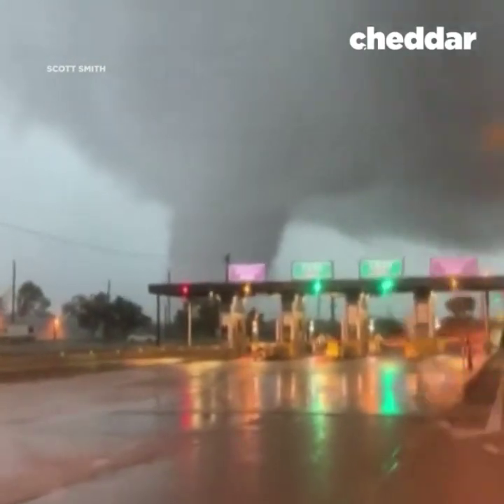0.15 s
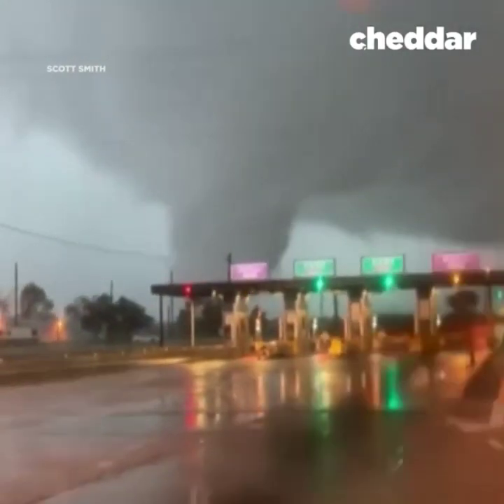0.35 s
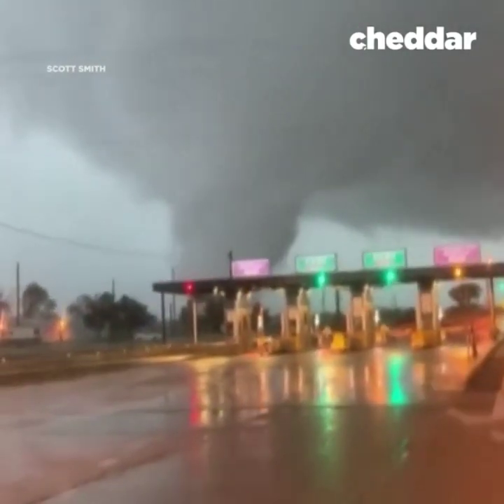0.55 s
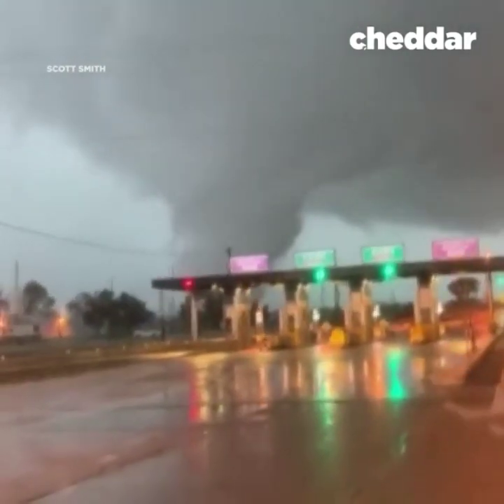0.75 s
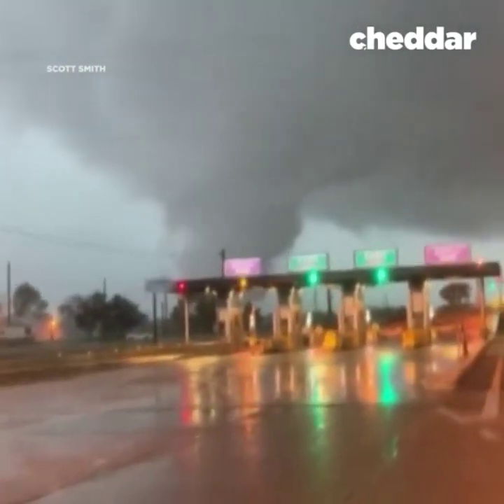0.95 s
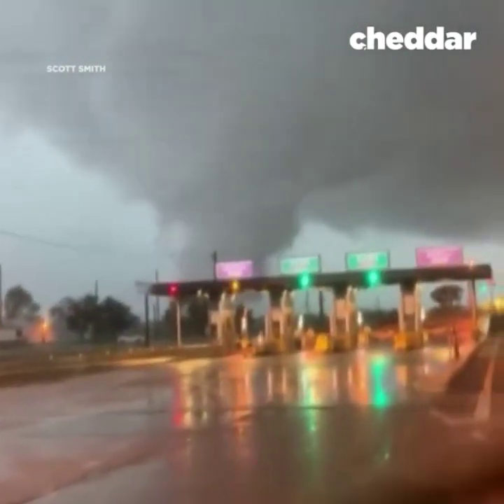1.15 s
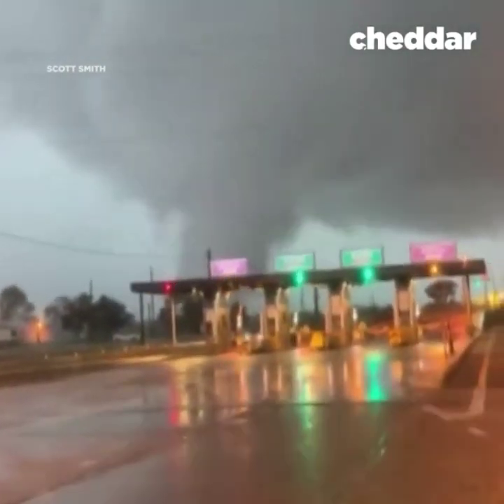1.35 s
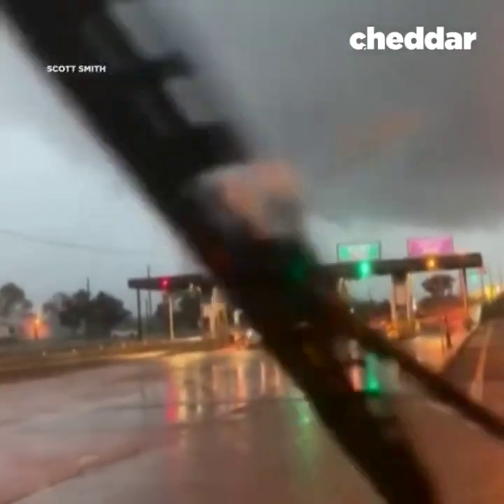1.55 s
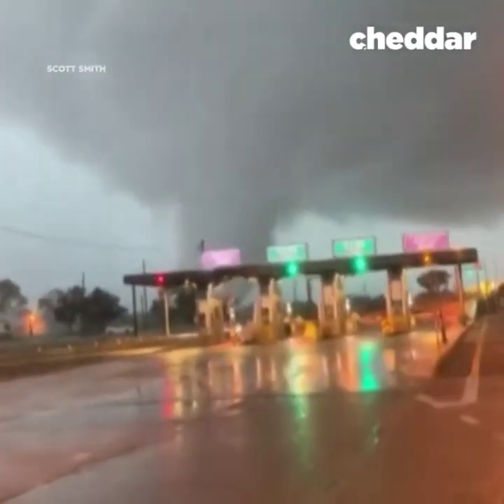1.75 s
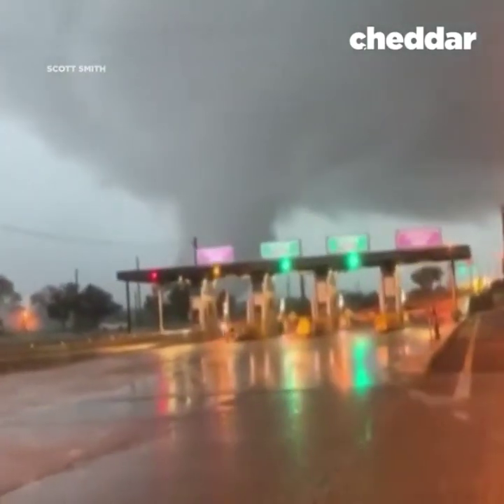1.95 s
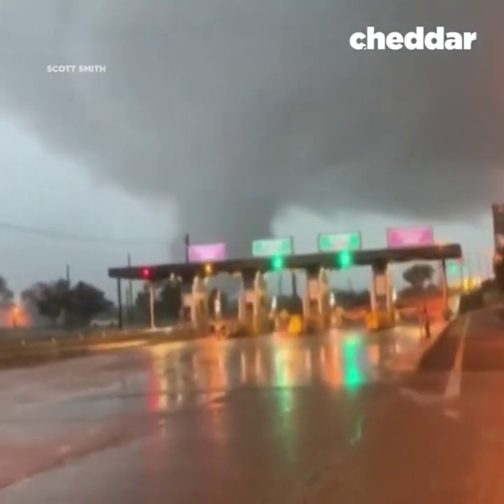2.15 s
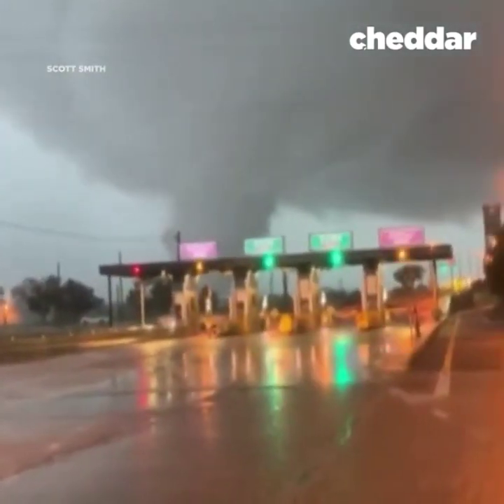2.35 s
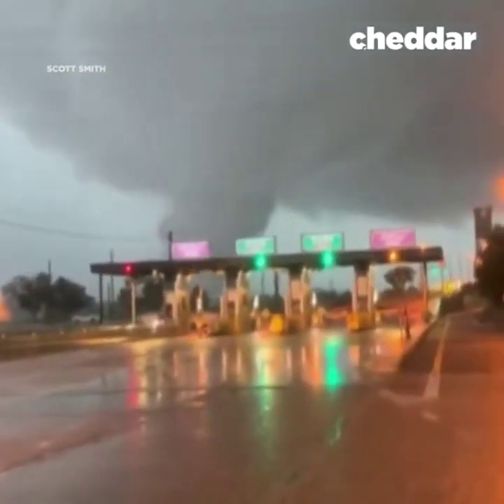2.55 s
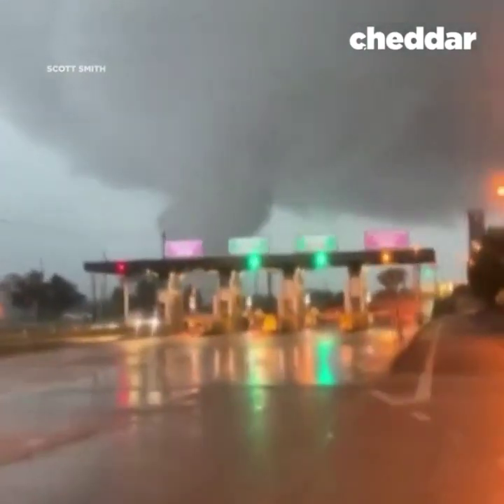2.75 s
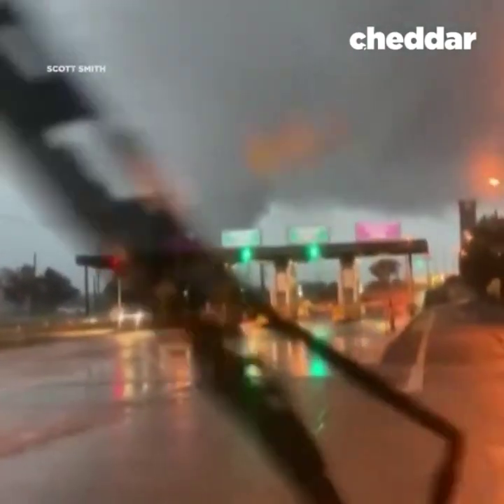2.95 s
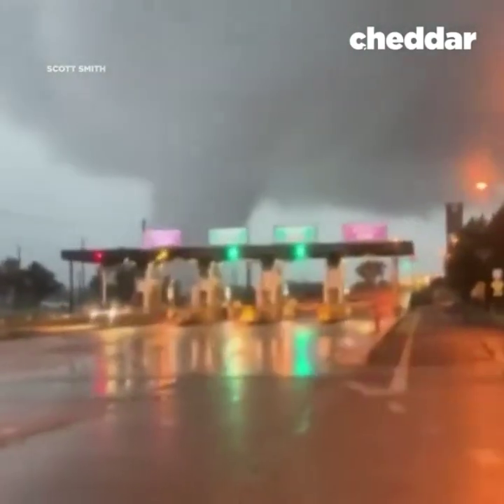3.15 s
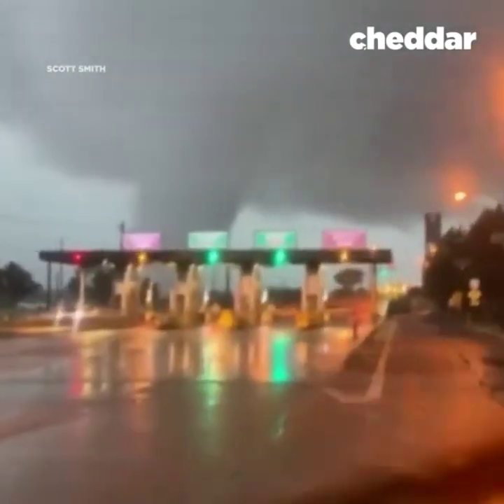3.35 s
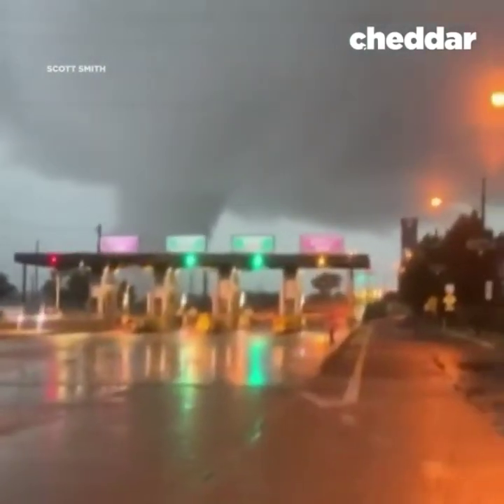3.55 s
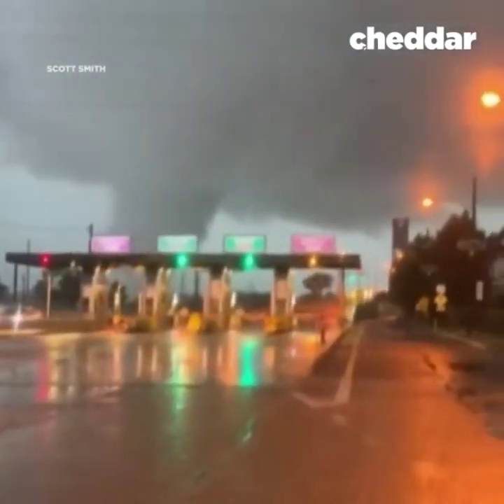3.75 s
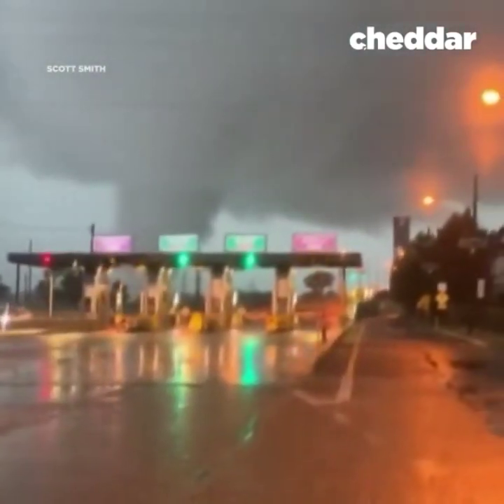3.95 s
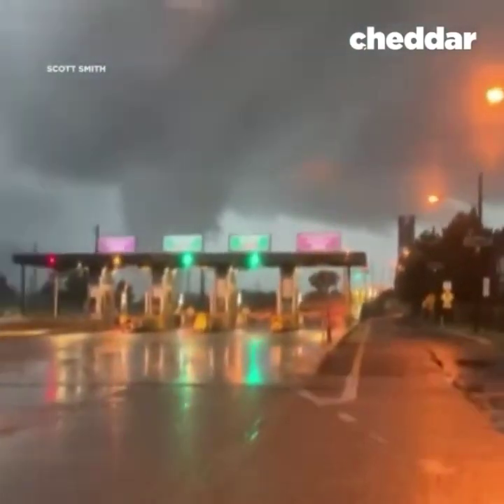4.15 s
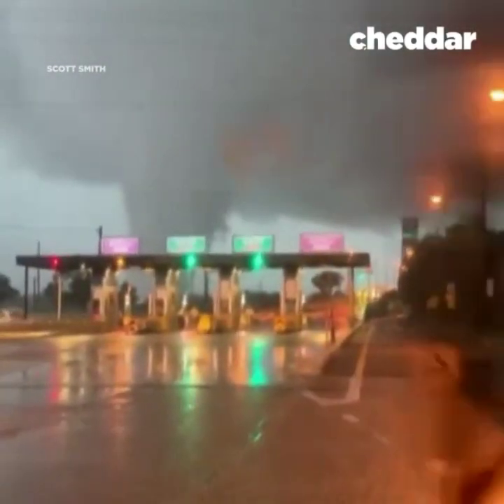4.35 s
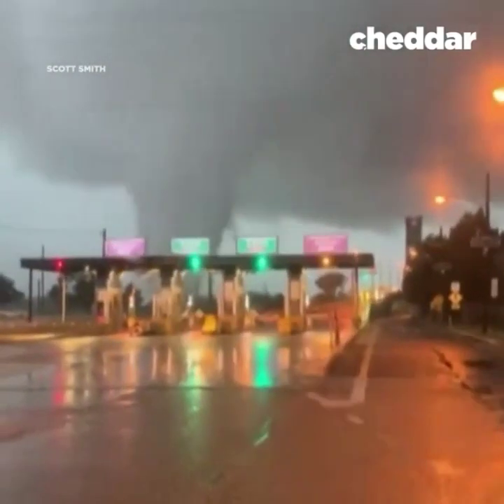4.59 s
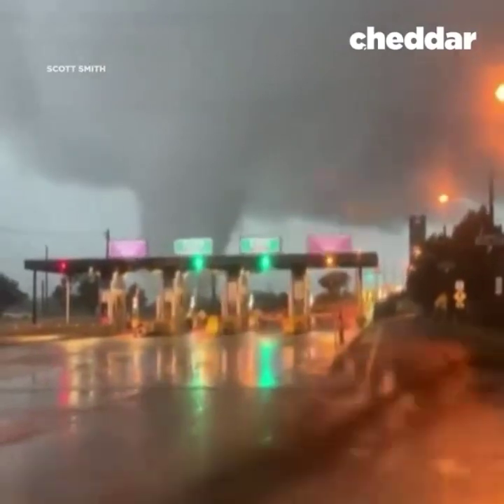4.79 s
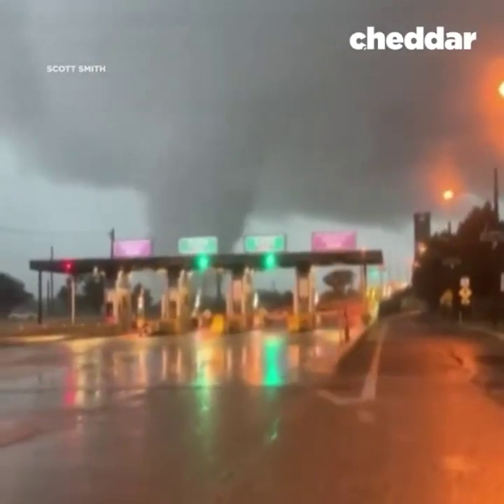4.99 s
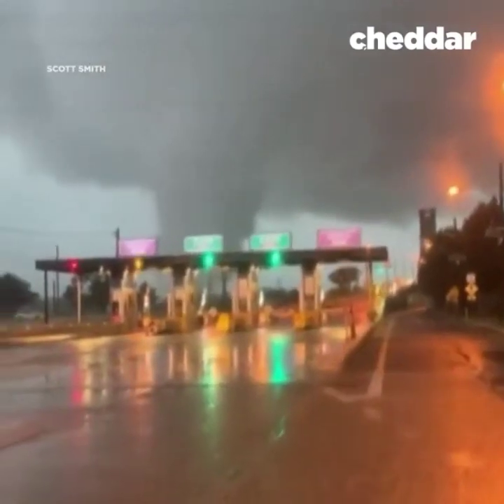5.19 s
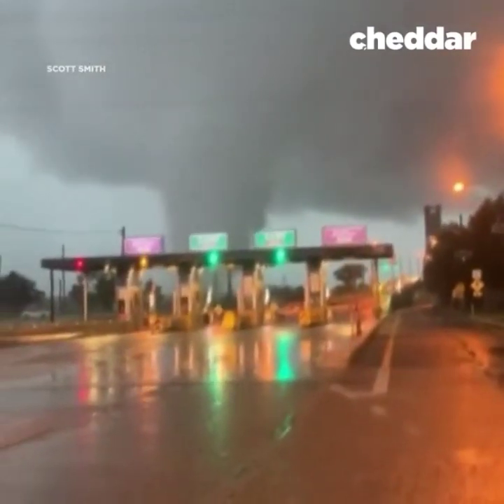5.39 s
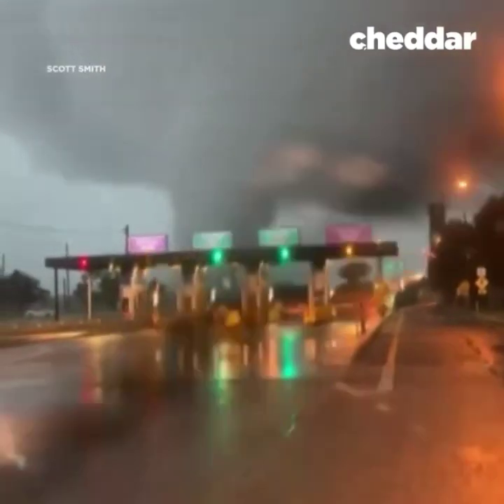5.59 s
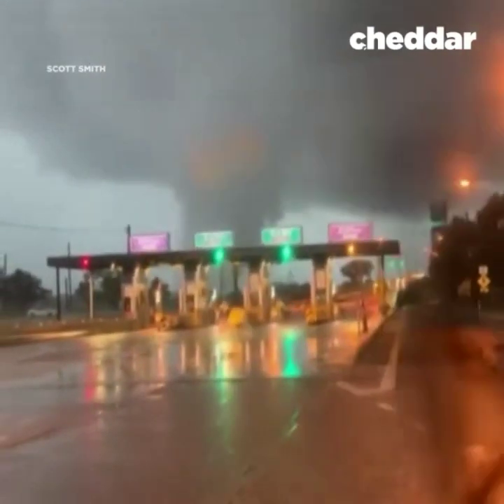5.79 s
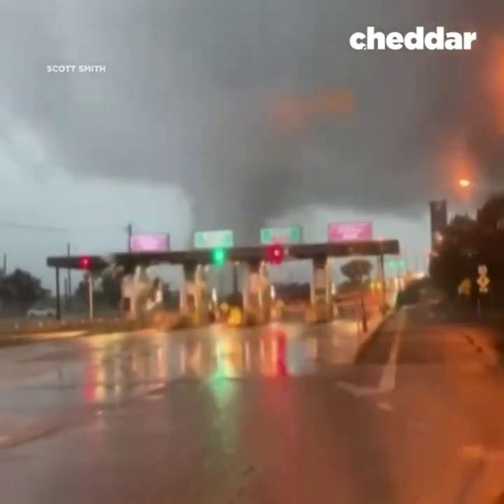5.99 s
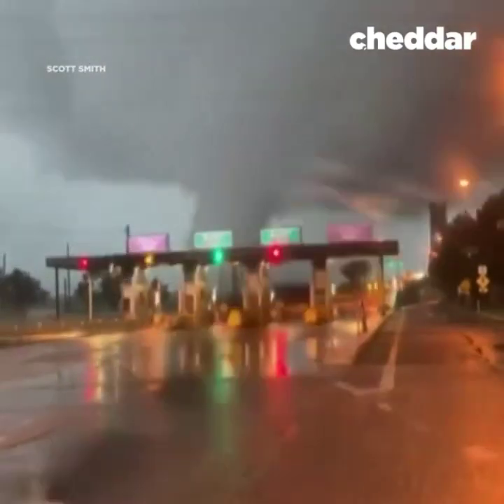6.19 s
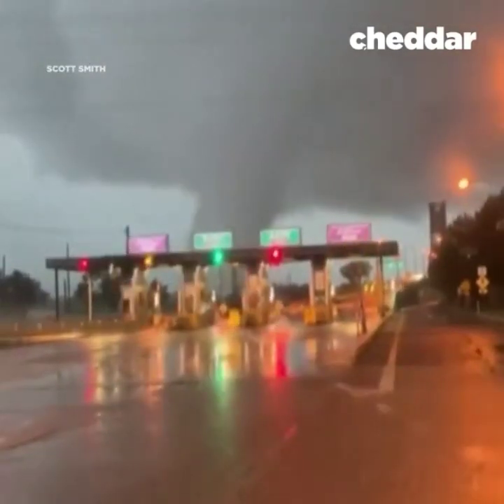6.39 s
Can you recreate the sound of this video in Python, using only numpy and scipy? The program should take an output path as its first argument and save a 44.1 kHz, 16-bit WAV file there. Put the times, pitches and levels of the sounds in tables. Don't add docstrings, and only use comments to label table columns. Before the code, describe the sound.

Inside a car in rain, low road rumble and soft wet tyre hiss, with windscreen wipers thumping and clunking every second and a half.

```python
import sys
import numpy as np
from scipy import signal
from scipy.fft import rfft, irfft, next_fast_len
from scipy.io import wavfile
from scipy.ndimage import uniform_filter1d, map_coordinates

SR = 44100
rng = np.random.default_rng(int(sys.argv[2]) if len(sys.argv) > 2 else 0)


def store_pcm(level_fs):
    pcm = np.round(np.clip(level_fs, -1, 1) * 32767).astype(np.int16)
    wavfile.write(sys.argv[1], SR, np.atleast_2d(pcm).T)


def nominal_scale(level):
    x = np.asarray(level, float) / 20
    return 10 ** x


N = 283563

# f/Hz, density/dB per Hz
SCUFF_SPECTRUM = [(150, -15), (350, 2), (520, 3), (1000, -11.5), (1500, -11.5), (2200, -25), (4000, -23.5),
                  (8000, -49)]
# f/Hz, density/dB per Hz
CRACK_SPECTRUM = [(1500, -26.5), (3000, 2.5), (4300, 0.5), (6500, -6.5), (9000, -14.5), (11000, -39),
                  (15000, -48)]
# t/s, end/s, f/Hz, level/dB
LINK_TONE = [
    (3.12, 3.92, 14062, -84),
    (5.89, 6.35, 14062, -83),
]
QUARTER_LEAD = np.array([[0], [1 / 4]])


def since(start):
    return np.clip(np.arange(N) / SR - start, 0, None)


def between(start, end):
    return (since(start) > 0) * (since(end) == 0)


def unit(x):
    return x / np.sqrt(np.mean(x ** 2) + 1e-20)


def along(points, hz):
    f, value = np.transpose(points)
    return np.interp(np.log(hz + 1), np.log(f + 1), value)


def filtered(x, response):
    size = next_fast_len(N + SR // 2)
    hz = np.fft.rfftfreq(size, 1 / SR)
    return irfft(rfft(x, size) * response(hz), size)[..., :N]


def modes(table):
    def response(f):
        total = 0
        for k, (centre, width, db) in enumerate(table):
            damping = 1j * f * width
            total = total + (-1) ** k * nominal_scale(db) * damping / (centre * centre - f * f + damping)
        return total
    return response


def colour(points):
    return lambda hz: nominal_scale(along(points, hz))


def rush(response, patchy_db):
    z = signal.stft(rng.standard_normal((2, N + 512)), nperseg=512)[2]
    field = uniform_filter1d(rng.standard_normal(z.shape[1:]), size=6, axis=0)
    field = uniform_filter1d(field, size=10, axis=1)
    noise = signal.istft(z * nominal_scale(patchy_db * unit(field)), nperseg=512)[1][:, :N]
    return unit(filtered(noise, response))


def held(start, length, db, rise, fall, sag_db):
    t = since(start)
    release = np.exp(-np.clip(t - length, 0, None) / fall)
    return nominal_scale(db - sag_db * t) * (1 - np.exp(-t / rise)) * release


def bursts(times, dbs, rise, t60):
    t = np.arange(N) / SR
    total = 0
    for s, db in zip(times, dbs):
        onset = 1 - np.exp(-np.clip(t - s, 0, 1) / rise)
        total = total + nominal_scale(db - 60 * np.abs(t - s) / t60) * onset
    return total


def struck(envelope, response):
    noise = rng.standard_normal((2, N))
    return filtered(noise * envelope, response) / np.std(filtered(noise, response))


def blows(times, dbs, soft, response, spread):
    t = np.arange(N) / SR
    push = sum(nominal_scale(db) * np.exp(-((t - s) / soft) ** 2) for s, db in zip(times, dbs))
    shape = filtered(-push, response)
    return np.array([shape, spread * np.imag(signal.hilbert(shape))])


def thump(s, db, hz, length):
    t = np.arange(N) / SR - s
    swing = np.cos(2 * np.pi * (hz * t + QUARTER_LEAD))
    return nominal_scale(db) * np.exp(-(t / length) ** 2) * swing * [[1], [1.5]]


def ring(s, db, rise):
    # f/Hz, level/dB, T60/s
    shell_modes = [(86.6, -19, 0.76), (252, -7.5, 0.14), (327, -13.5, 0.17), (411.5, -19.5, 0.24)]
    t = since(s)
    phases = rng.random(len(shell_modes))
    late, main_phase = rng.random(2)
    main_hz = 163 + 42 / (1 + np.exp(-(t - 0.045 - 0.012 * late) / 0.00764))
    main_cycles = np.cumsum(main_hz) / SR + main_phase + QUARTER_LEAD
    total = nominal_scale(0.5 - 60 * t / 0.43) * np.sin(2 * np.pi * main_cycles)
    for (hz, level, t60), phase in zip(shell_modes, phases):
        total += nominal_scale(level - 60 * t / t60) * np.sin(2 * np.pi * (hz * t + phase + QUARTER_LEAD))
    return nominal_scale(db) * (1 - np.exp(-t / rise)) * total * [[1], [0.9]]


def glass(f):
    # f/Hz, width/Hz, level/dB
    pane_modes = [(460, 330, -9), (772, 58, -5.5), (956, 120, -6), (1348, 162, -1.5), (1440, 300, -5.5),
                  (2100, 640, -16.5)]
    return modes(pane_modes)(f) / (1 + 1j * f / 2600) ** 2


def road():
    # t/s, water level/dB, unevenness level/dB
    surface = [(0, -2.5, 3), (.5, -1, -2), (.75, -2.5, -1.5), (1.1, -1.5, 1.5), (1.45, -3, -1.5),
               (1.8, 1.5, -0.5), (2.3, -3.5, -0.5), (2.7, -5.5, -1), (3.3, 0.5, 0.5), (4.1, 2, -1.5),
               (4.6, -3, 1), (4.95, -9, -2.5), (5.25, -2, -0.5), (5.4, 3, -0.5), (5.8, 2.5, -0.5),
               (6.05, 9, 2), (6.43, 0, -0.5)]
    # t/s, length/s, level/dB, finest mist over it/dB
    puddles = [(0, .03, -77, -4.5), (0.34, .12, -88.5, -7), (0.844, 0.099, -90.5, 10),
               (1.695, 0.15, -71.5, -8), (1.98, .12, -83, 3), (2.512, .05, -82, 3), (2.726, 0.15, -89.5, 8),
               (3.099, .05, -68.5, -6), (3.507, .025, -76, -8), (3.72, 0.056, -81.5, -6),
               (3.927, 0.038, -86, 2.5), (4.157, .06, -72, -1.5), (4.38, 0.044, -73, -5),
               (4.589, .025, -82, 0), (4.815, 0.042, -87, 16.5), (5.415, 0.22, -82, 0),
               (5.837, 0.044, -82.5, 8), (5.896, 0.083, -76.5, 2.5), (6.144, 0.055, -84, 0)]
    # f/Hz, width/Hz, level/dB
    air_modes = [(85.7, 16.7, -10), (120.8, 15.4, -3.5), (165.9, 32, 1), (209.6, 32.9, -0.5),
                 (247.4, 36.2, -6)]
    # f/Hz, density/dB per Hz
    body_spectrum = [(20, -23.5), (60, -10.5), (120, 4), (300, -2.5), (500, -1), (1000, -8.5),
                     (1600, -13.5), (2400, -18.5), (3500, -57.5)]
    # f/Hz, density/dB per Hz
    hiss_spectrum = [(800, -22), (2000, -1), (3000, 2.5), (4200, -0.5), (6500, -2), (9300, -10),
                     (9600, -42), (13400, -23), (13700, -47.5)]
    # f/Hz, density/dB per Hz
    spray_spectrum = [(4000, -22), (7000, -11), (9000, 5.5), (11500, 0), (13300, -5.5), (13800, -38)]
    # f/Hz, density/dB per Hz
    finest_spectrum = [(11000, -25), (12400, 0), (13400, 8), (14500, 3.5), (15700, 4)]

    s, *columns = np.transpose(surface)
    water_db, bump_db = [np.interp(np.arange(N) / SR, s, c) for c in columns]

    def cabin(f):
        return modes(air_modes)(f) / (1 + (f / 300) ** 6) / (1 + (70 / (f + 1)) ** 4)

    sheets = fine_sheets = 0
    for s, length, db, finer_db in puddles:
        sheet = held(s, length, db, rise=0.008, fall=0.015, sag_db=26)
        sheets = sheets + sheet
        fine_sheets = fine_sheets + nominal_scale(finer_db) * sheet

    boom = nominal_scale(-37.5 + bump_db)
    body = nominal_scale(-53 + 0.29 * bump_db + 0.12 * water_db)
    hiss = nominal_scale(-59 + 0.3 * water_db)
    spray = nominal_scale(-80 + water_db) + nominal_scale(3) * sheets
    finest = nominal_scale(-83.5 + 1.1 * water_db) + nominal_scale(4) * fine_sheets
    out = boom * rush(cabin, patchy_db=-0.5)
    out += body * rush(colour(body_spectrum), patchy_db=1.13)
    out += hiss * rush(colour(hiss_spectrum), patchy_db=1.8)
    out += spray * rush(colour(spray_spectrum), patchy_db=4.5)
    return out + finest * rush(colour(finest_spectrum), patchy_db=5.5)


def motor():
    # f/Hz, width/Hz, level/dB
    gear_modes = [(880, 220, -5.5), (1238, 100, -2), (1528, 44, 2.5)]
    # t/s, length/s, level/dB, sag/dB per s
    strain = [
        (0.851, .5, -57.5, 21.5),
        (1.91, .47, -68.5, -1),
    ]
    load = sum(held(s, length, db, 0.014, 0.03, sag) for s, length, db, sag in strain)
    return (nominal_scale(-69.5) + load) * rush(modes(gear_modes), patchy_db=2.5)


def blade_landing():
    # t/s, peak level/dB, thump level/dB, thump f/Hz, thump delay/s
    landings = [
        (0.184, -30, -16.5, 205, 0.018),
        (1.644, -30.5, -18, 188, 0.019),
        (3.114, -31, -18.5, 208, 0.0149),
        (4.58, -27.5, -21.5, 204, 0.01595),
        (6.045, -28, -17.5, 200, 0.016),
    ]
    s, db, low_db, hz, delay = np.transpose(landings)
    out = struck(bursts(s, db - 4, rise=0.0015, t60=0.11), colour(SCUFF_SPECTRUM))
    drag_s = 0.07
    drag = sum(held(t - drag_s, drag_s, level - 27, 0.038, 0.0093, 0) for t, level in zip(s, db))
    out += struck(drag, glass)
    for t, level, f in zip(s + delay, low_db, hz):
        out += thump(t, level, f, length=0.006)
    return out


def linkage_clunk():
    # t/s, peak level/dB, crack level/dB, boom level/dB
    clunks = [
        (0.215, -23.5, -19, -19.5),
        (1.677, -26.5, -18.5, -21.5),
        (3.143, -23, -20.5, -20.5),
        (4.608, -23, -18, -21),
        (6.075, -23, -18, -21),
    ]
    s, db, crack_db, low_db = np.transpose(clunks)
    out = blows(s + 0.00139, db + 20, 0.00008, glass, spread=0.56)
    out += blows(s + 0.012, db + 16, 0.000077, glass, spread=-0.51)
    out += struck(bursts(s - 0.004, db - 7, rise=0.003, t60=0.08), glass)
    crack = colour(CRACK_SPECTRUM)
    out += struck(bursts(s - 0.003, db + crack_db + 8.5, rise=0.0034, t60=0.053), crack)
    out += struck(bursts(s - 0.016, db + crack_db - 5.5, rise=0.011, t60=0.24), crack)
    out += struck(bursts(s + 0.0058, db - 22, rise=0.0043, t60=0.29), colour(SCUFF_SPECTRUM))
    for t, level in zip(s, low_db):
        out += ring(t + 0.00423, level, rise=0.0088)
    return out


def top_turn():
    # t/s, peak level/dB, crack level/dB, boom level/dB
    turns = [
        (0.445, -50, -12, -48),
        (0.922, -43.5, -26, -32),
        (2.387, -43, -36, -29),
        (3.854, -42, -27, -32),
        (3.955, -52, -20, -42),
        (5.316, -37, -35, -30),
    ]
    s, db, crack_db, low_db = np.transpose(turns)
    out = blows(s + 0.00067, db + 20.5, 0.00035, glass, spread=0.3)
    out += struck(bursts(s - 0.001, db - 5.5, rise=0.0012, t60=0.087), glass)
    out += struck(bursts(s - 0.03, db - 9, rise=0.0089, t60=0.44), colour(SCUFF_SPECTRUM))
    out += struck(bursts(s, db + crack_db - 5, rise=0.002, t60=0.083), colour(CRACK_SPECTRUM))
    for t, level in zip(s, low_db):
        out += ring(t, level, rise=0.0082)
    return out


def splashes():
    # t/s, peak level/dB, centre f/Hz, breadth/natural log of f, length/s
    drops_on_glass = [
        (3.535, -42.5, 8280, 0.45, 0.0036),
        (4.164, -49.5, 11000, 1, 0.0083),
        (4.389, -57, 10900, 0.74, 0.012),
        (5.856, -51, 7050, 0.25, 0.0063),
        (5.874, -53, 7460, 0.21, 0.052),
        (5.986, -49.5, 6960, 0.27, 0.0087),
        (6.141, -45, 5960, 0.46, 0.0085),
        (6.197, -44.5, 3300, 0.71, 0.0076),
    ]
    out = 0
    for s, db, hz, breadth, length in drops_on_glass:
        def bell(f):
            return np.exp(-(np.log((f + 1) / hz) / breadth) ** 2)
        out = out + struck(bursts([s], [db], rise=length / 4, t60=8 * length), bell)
    return out


def knock():
    # t/s, peak level/dB
    taps = [
        (5.8844, -33),
        (5.888, -26),
        (5.929, -37),
    ]
    # f/Hz, width/Hz, level/dB
    trim_modes = [(530, 150, 0), (940, 150, -1.5)]

    def hollow(f):
        return sum(modes([mode])(f) ** 2 for mode in trim_modes)

    s, db = np.transpose(taps)
    out = blows(s, db + 22.5, 0.000089, hollow, spread=0.074)
    out += thump(s[0] + 0.0213, -26.5, 200, length=0.007)
    return out + struck(bursts(s, db - 25, rise=0.0011, t60=0.041), colour(CRACK_SPECTRUM))


def ports(pair):
    # f/Hz, coherence/1
    likeness = [(200, 1), (300, 1), (600, 0.48), (1200, 0.63), (4700, 0.4), (5700, 1), (8500, 0.22),
                (15000, .7)]
    # f/Hz, phase/rad
    case_phase = [(0, 0), (1600, -.25), (2700, .33), (3600, -.97), (4800, -1.08), (6400, .37), (9500, 0),
                  (12300, -1.4), (14000, .2), (15000, -.3), (15400, .5)]

    def shares(hz):
        angle = np.arccos(np.clip(along(likeness, hz), 0, 1)) / 2
        return np.array([np.cos(angle), np.sin(angle)])

    def lead(hz):
        phase = 2 * np.pi * hz * 140e-6 + np.interp(hz, *np.transpose(case_phase))
        return np.exp(0.5j * phase * [[1], [-1]])

    direct, diffuse = filtered(pair, shares)
    return filtered(np.array([direct + diffuse, direct - diffuse]), lead)


def scene():
    wipers = blade_landing() + linkage_clunk() + top_turn()
    return ports(road() + motor() + wipers + splashes() + knock())


def needs(bands, hz):
    def above(edge):
        return 0.5 + 0.5 * np.tanh((hz / edge - 1) / 0.019)
    elsewhere_db = -26.5
    return elsewhere_db + sum((db - elsewhere_db) * (above(low) - above(high)) for low, high, db in bands)


def starved(mid, side):
    # low f/Hz, high f/Hz, level/dB
    mid_needs = [(1850, 3900, -2), (4250, 5250, 11.5), (7700, 6200, -4.5), (11760, 12850, 10),
                 (12850, 16000, -9)]
    # low f/Hz, high f/Hz, level/dB
    side_needs = [(20, 265, -16.5), (6220, 7670, 15), (7670, 13400, -12.5), (13500, 15150, 17.5),
                  (15150, 16000, -5)]
    # t/s, end/s, level/dB
    attacks = [
        (3.097, 3.136, -8),
        (3.515, 3.546, -7),
        (4.593, 4.642, -16),
        (6.06, 6.074, -11),
        (6.13, 6.174, -4),
    ]
    hz, _, z = signal.stft(np.array([mid, side]), SR, nperseg=2048)
    cells = z.shape[1] // 6
    power = np.abs(z[:, :cells * 6]).reshape(2, cells, 6, -1) ** 2
    level_db = 10 * np.log10(uniform_filter1d(power.sum(2), size=3, axis=-1) + 1e-16)
    centre = hz[3:cells * 6:6, None]
    needed = np.array([needs(mid_needs, centre), needs(side_needs, centre)])
    short_of = needed - (level_db - level_db[::-1])
    usual_db = np.median(level_db, axis=-1, keepdims=True)
    short_of -= 0.39 * np.clip(level_db - usual_db, 0, 12)
    kept = 1 / (1 + np.exp(np.clip(short_of, -9, 9) / 0.33))
    z[:, :cells * 6] *= np.repeat(nominal_scale(-23.5) + kept, 6, axis=1)
    thin = signal.istft(z, SR, nperseg=2048)[1][:, :N]
    attack = sum(nominal_scale(db) * between(s, end) for s, end, db in attacks)
    return thin + uniform_filter1d(attack, size=128) * ([mid, side] - thin)


def hollowed(mid):
    on = sum(between(s, end) for s, end, *_ in LINK_TONE)
    band = filtered(mid, lambda hz: np.abs(hz - LINK_TONE[0][2]) < 520)
    return mid - uniform_filter1d(0.9 * on, size=1024) * band


def whistle():
    wander = map_coordinates(rng.standard_normal(200), [np.arange(N) * 22 / SR])
    tone = 0
    for s, end, hz, db in LINK_TONE:
        tone = tone + nominal_scale(db - 6) * np.sin(2 * np.pi * hz * since(s)) * (since(end) == 0)
    return nominal_scale(4 * wander) * tone


def low_pass(x):
    return signal.sosfilt(signal.butter(12, 15690, fs=SR, output="sos"), x)


def record(dry):
    mid, side = starved(dry.mean(0), (dry[0] - dry[1]) / 2)
    mid = hollowed(mid) + whistle()
    mid, side = filtered(np.array([mid, side]), lambda hz: hz < 15700)
    return low_pass(np.array([mid + side, mid - side]))


dry = scene()
out = record(dry)
store_pcm(out)
```